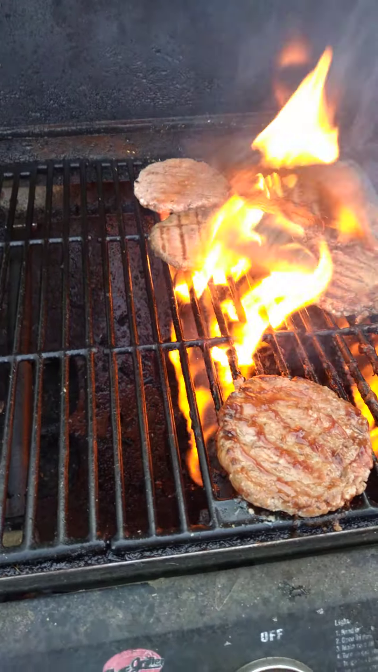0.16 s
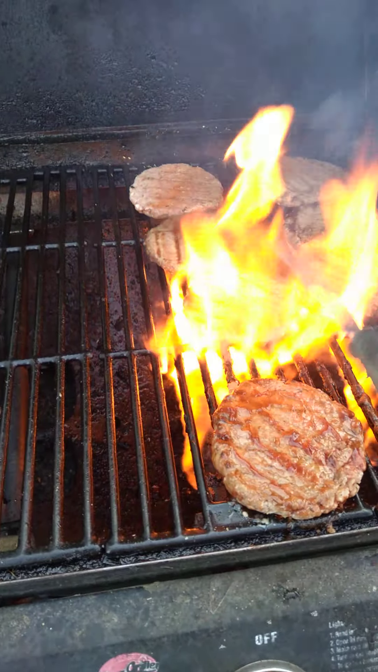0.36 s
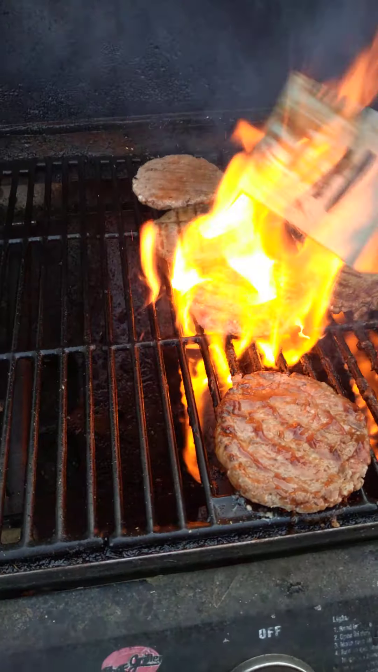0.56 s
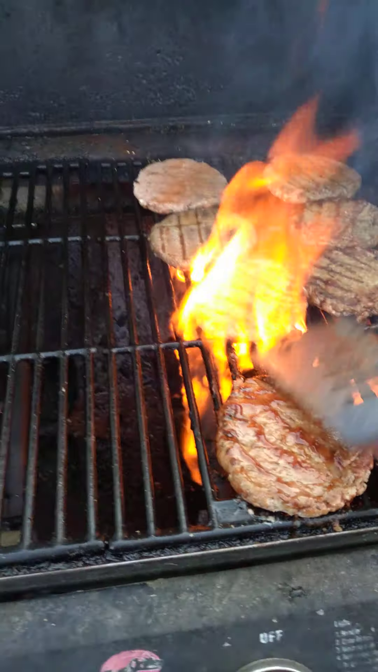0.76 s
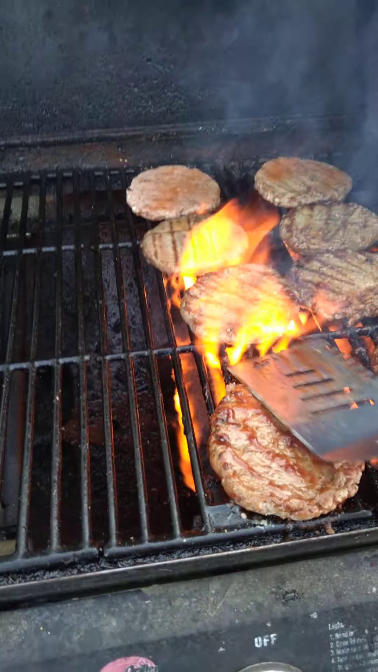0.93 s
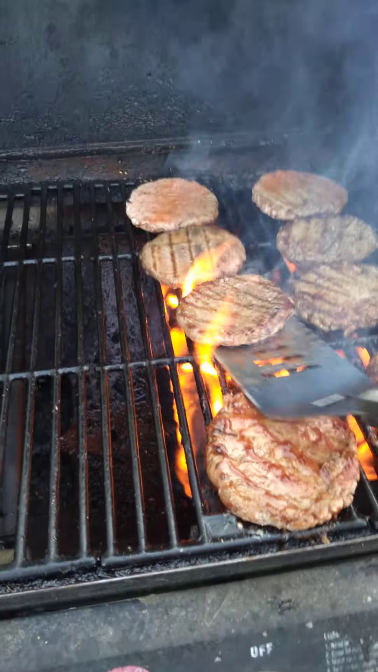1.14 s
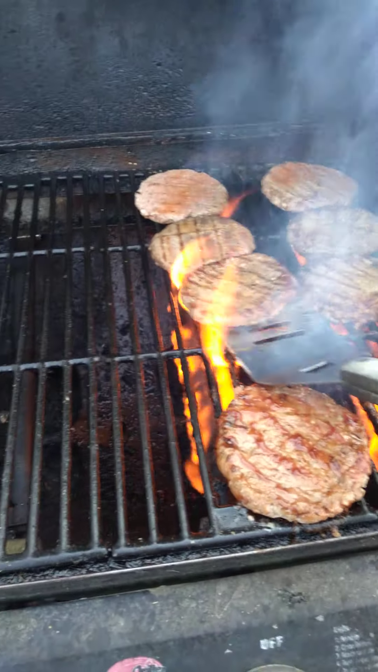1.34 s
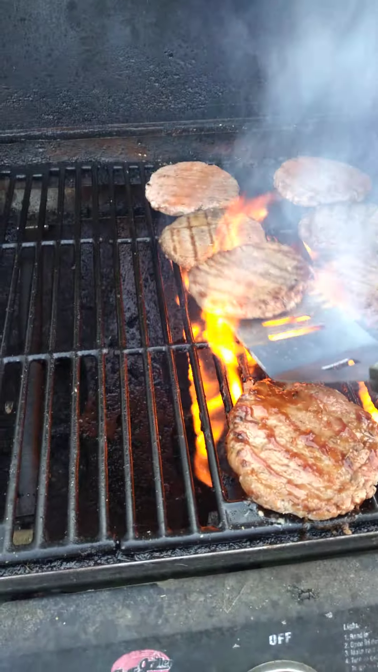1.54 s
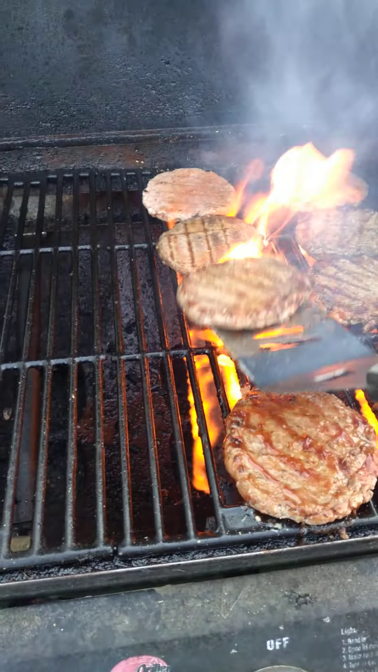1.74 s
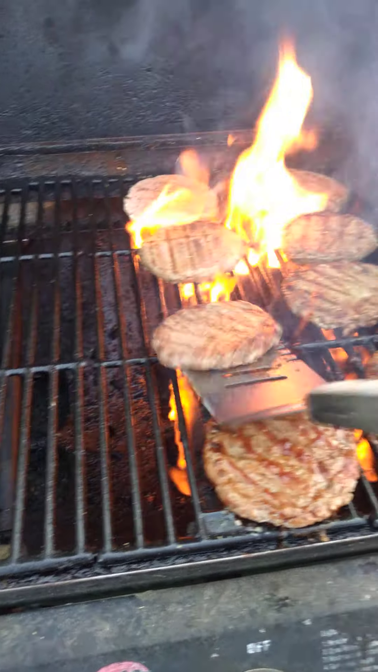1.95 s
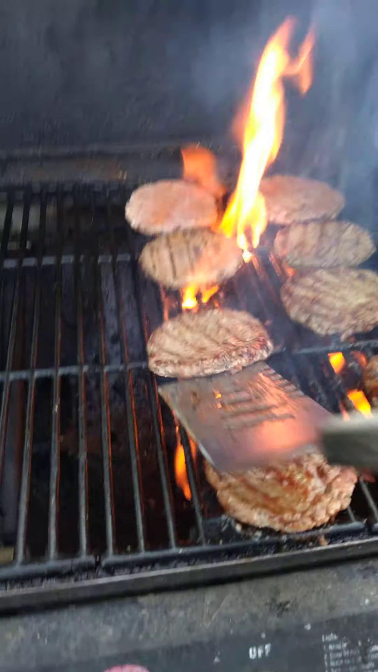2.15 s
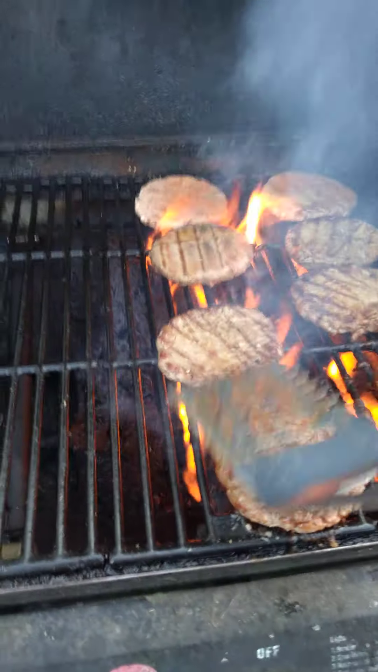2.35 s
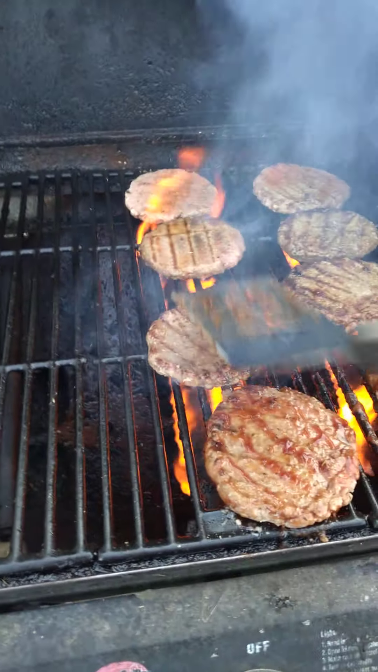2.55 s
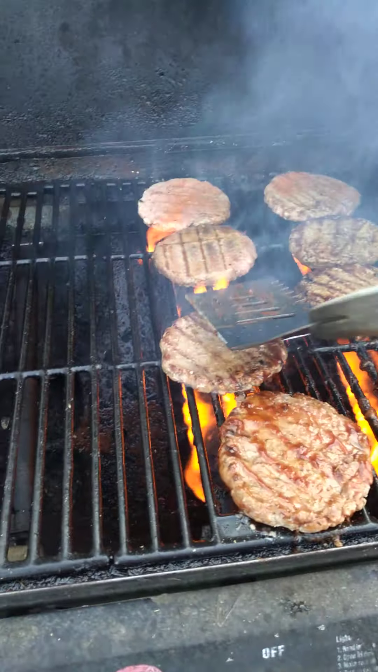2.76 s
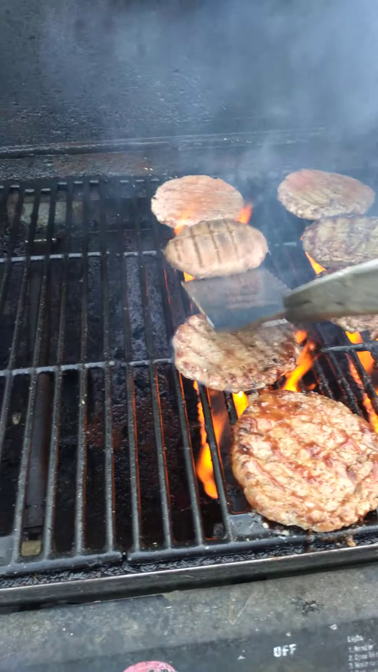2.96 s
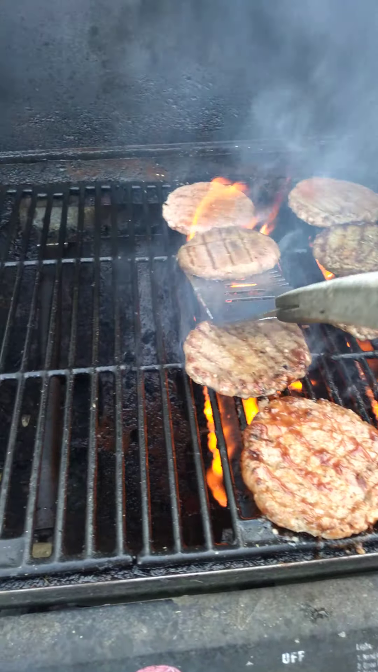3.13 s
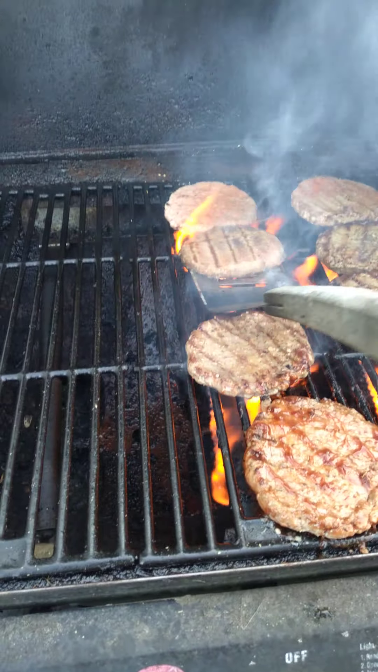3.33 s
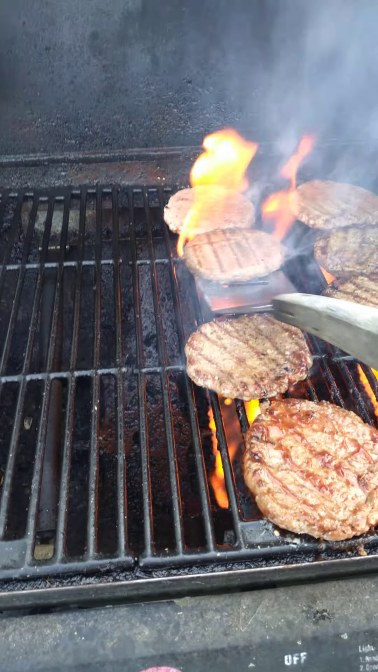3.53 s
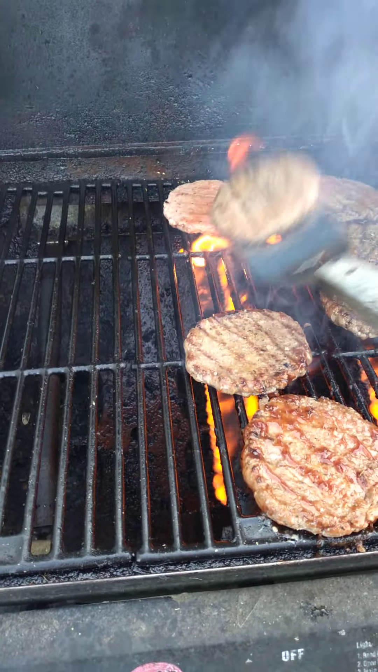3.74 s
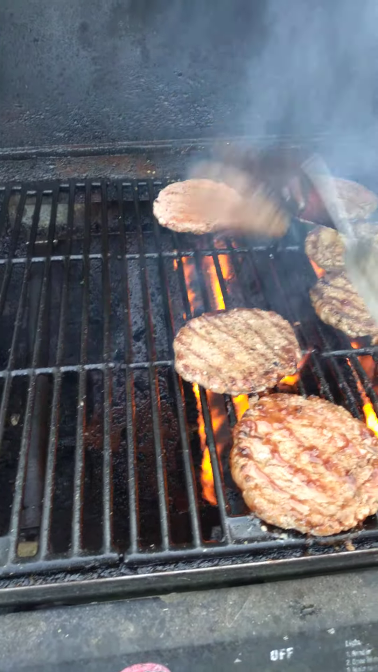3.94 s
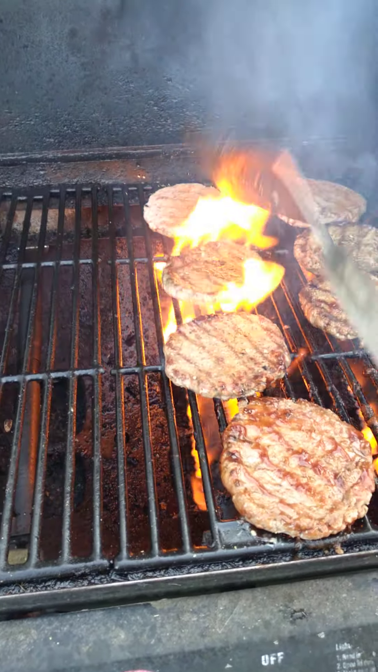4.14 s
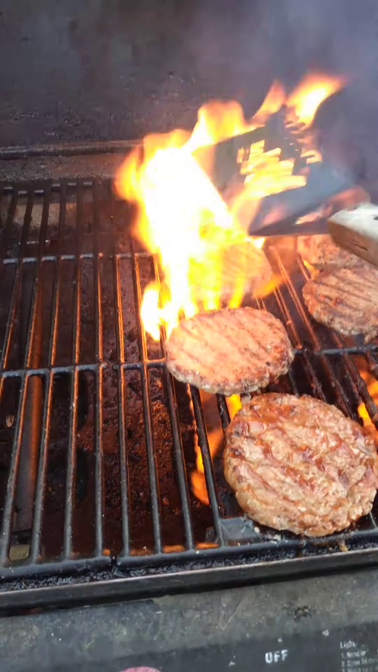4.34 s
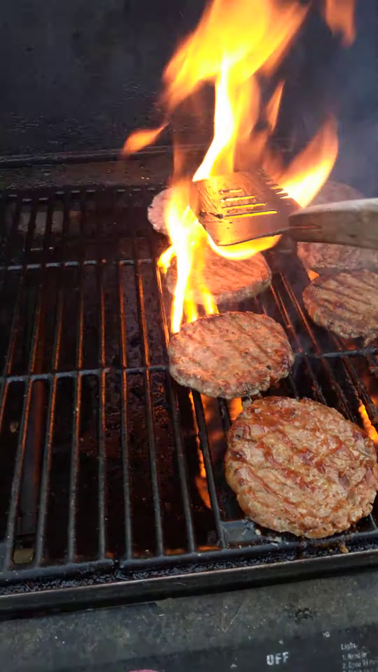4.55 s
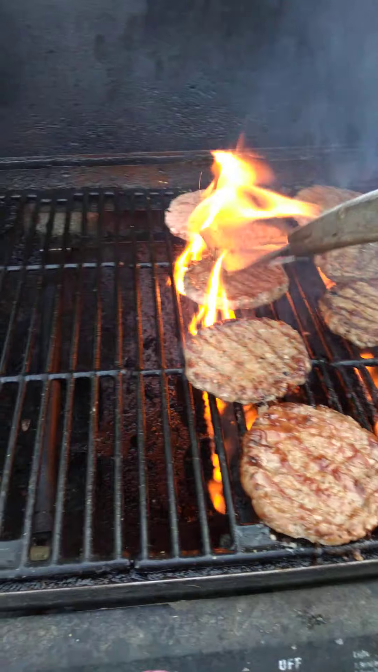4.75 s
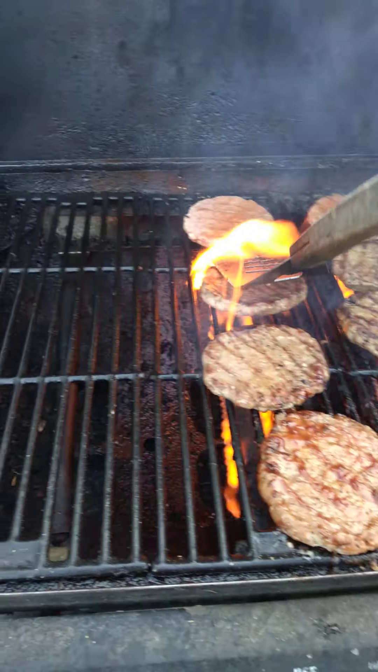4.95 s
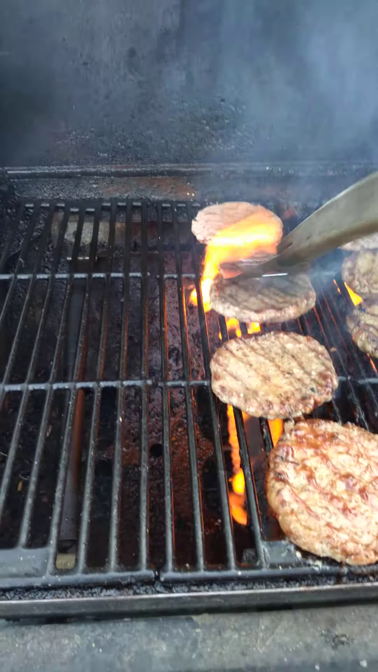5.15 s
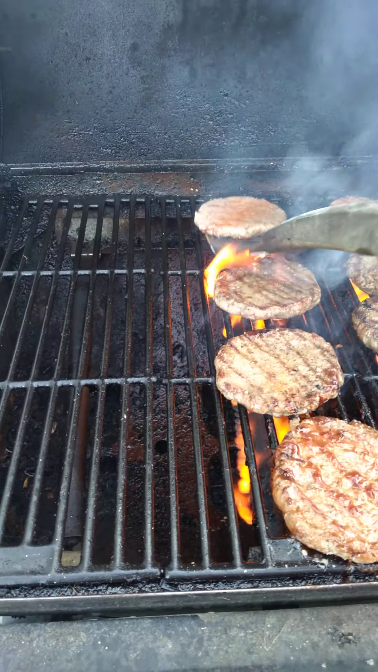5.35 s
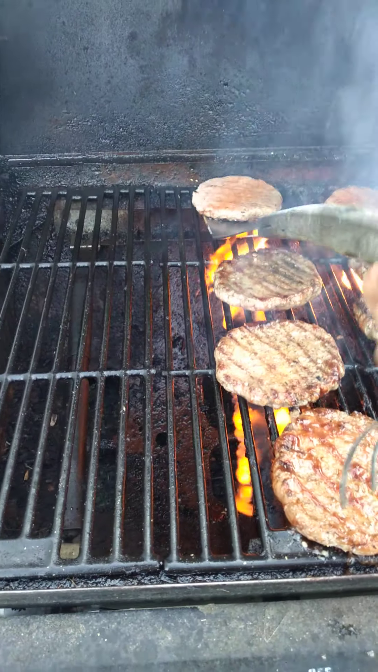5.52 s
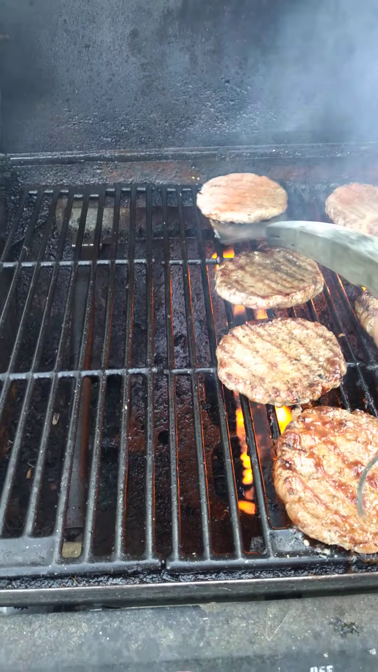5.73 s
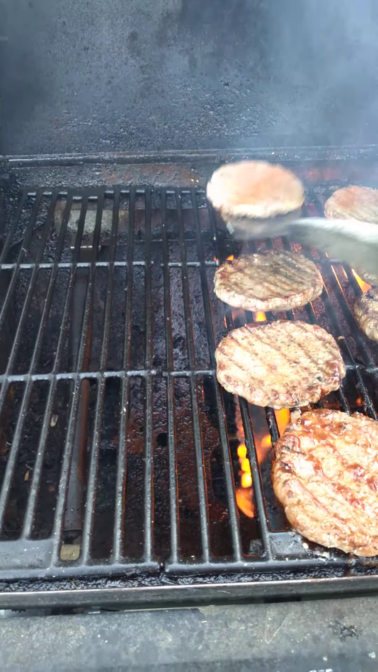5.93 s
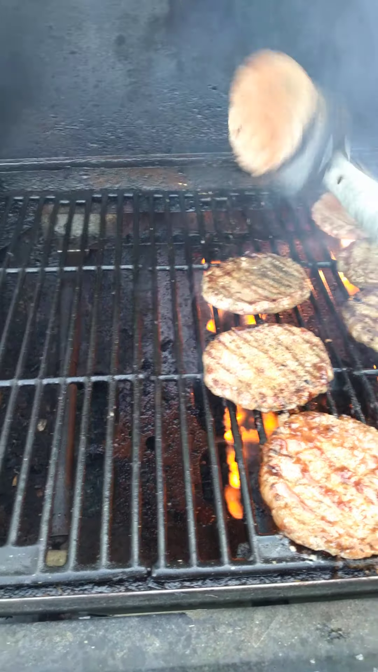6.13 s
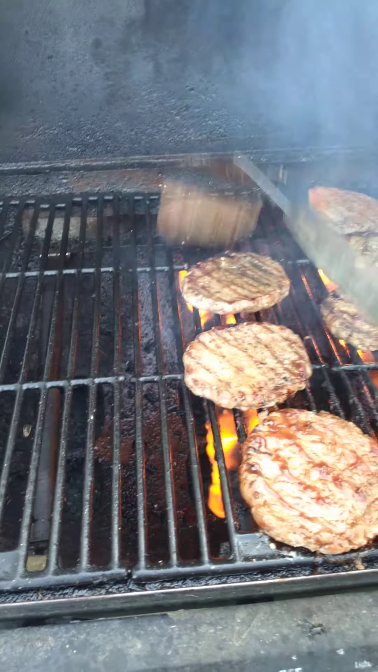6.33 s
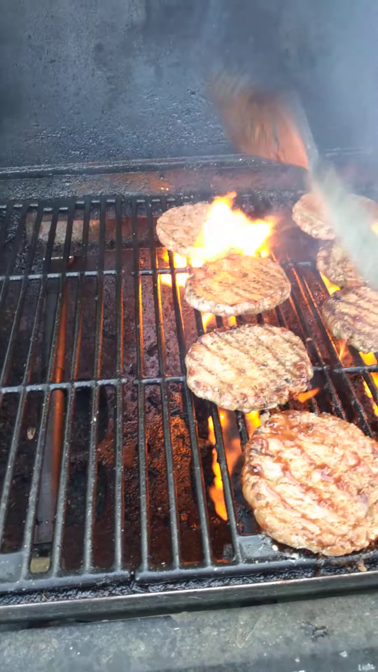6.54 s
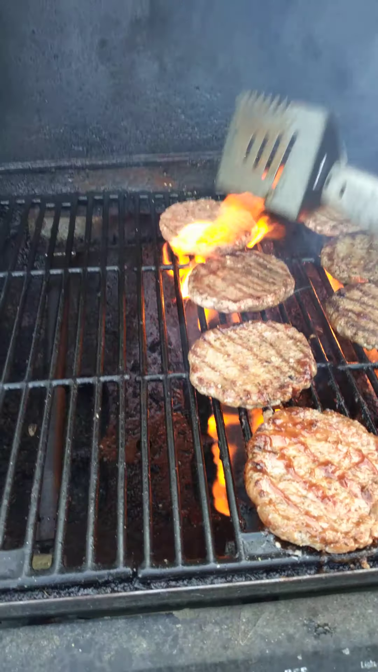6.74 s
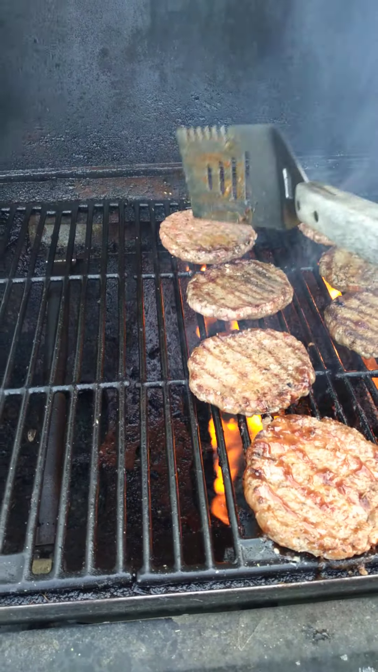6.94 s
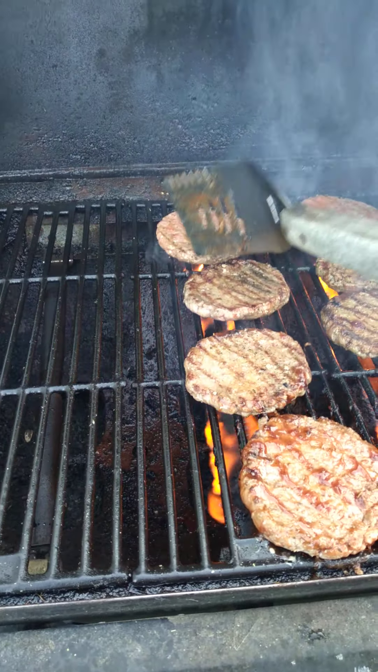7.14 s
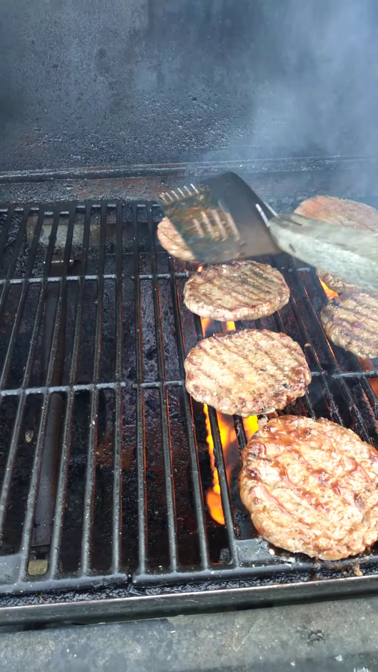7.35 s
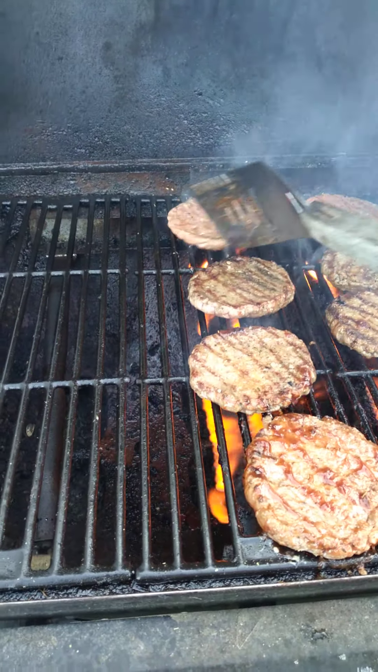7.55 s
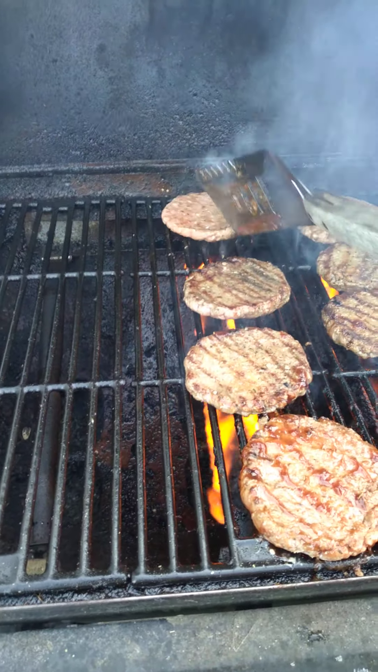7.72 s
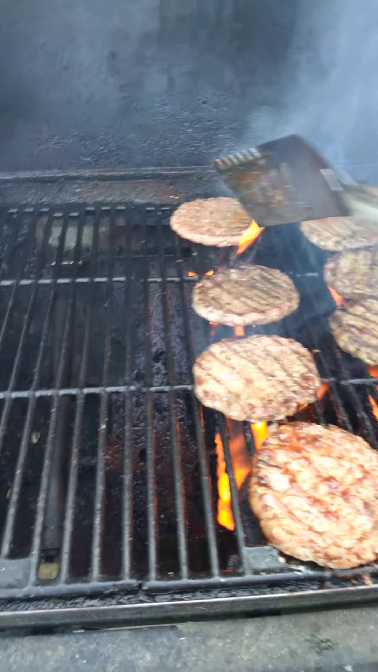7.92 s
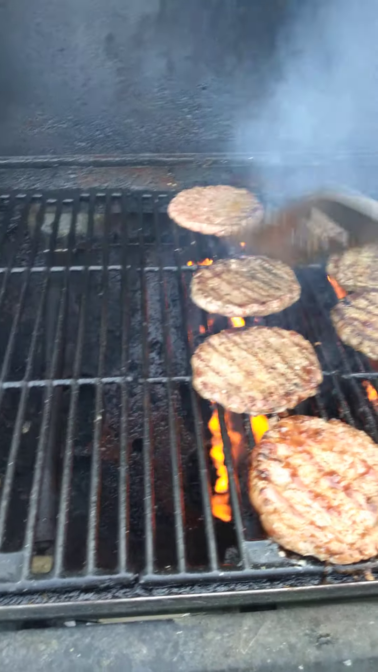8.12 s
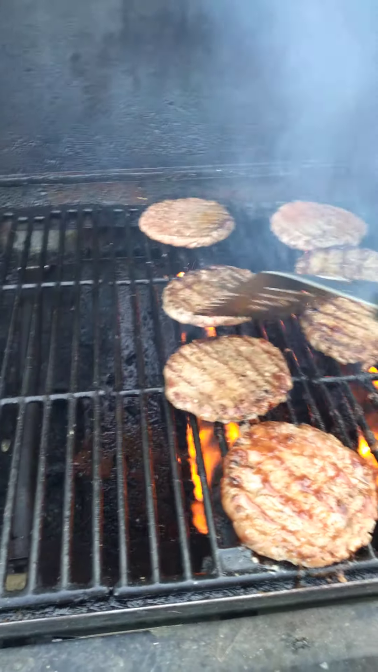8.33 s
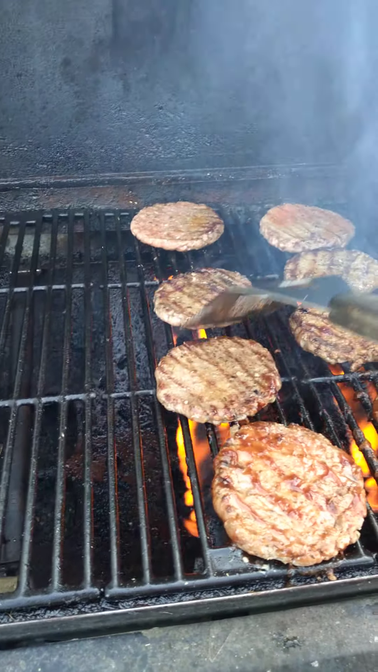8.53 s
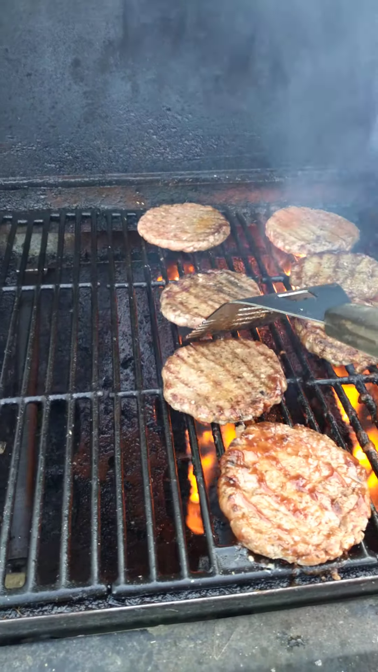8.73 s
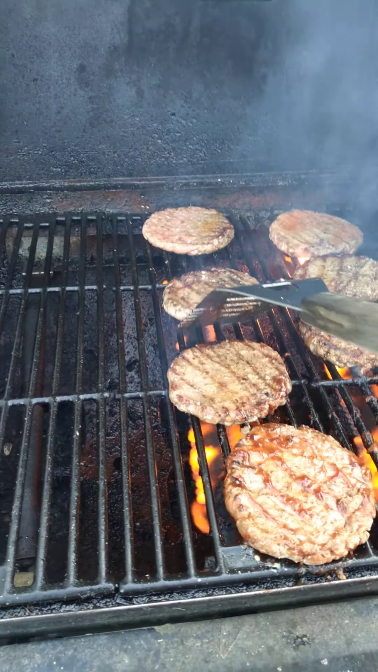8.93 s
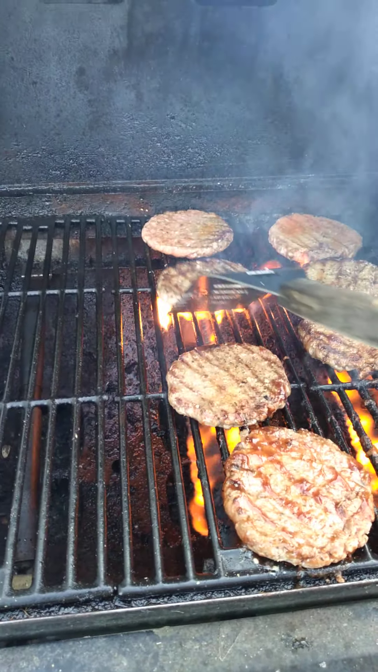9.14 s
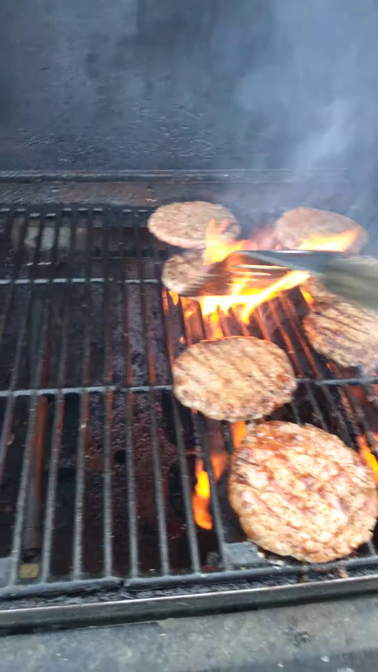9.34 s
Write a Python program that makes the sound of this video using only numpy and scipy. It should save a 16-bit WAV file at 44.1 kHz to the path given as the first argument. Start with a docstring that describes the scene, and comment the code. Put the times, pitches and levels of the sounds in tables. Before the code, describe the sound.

Burger patties sizzle close by on an outdoor gas grill, a steady, high hiss over a low burner rumble and a small engine idling far off. In the first half second the searing surges, with crackling fat and a spit of steam. A steel spatula strikes the grate sharply at 1 second, then scrapes as fat flares again near 1.8 seconds. Several briefly ringing clinks follow between 2.3 and 3.8 seconds. The biggest rush of searing and crackling comes from 4 to 4.7 seconds, followed by short scrapes and taps, with a sharp one at 5.1. At about 6.3 seconds a patty lands with a dull, hollow thud, then hisses, steams and crackles. The spatula taps lightly around 7.3 and 8.8 seconds. Just after 9 seconds come a ringing scrape, a smaller flare and a soft, low flutter of flame.

```python
"""Outdoors at a gas grill, burger patties fry while a steel spatula slides under them and flips them.
Bursting bubbles make a steady hiss. A turned patty lands with a thud, sears and spits steam,
and its fat crackles in the firebox as it flares. The blade taps the grate; short scrapes and sputters
come and go. Behind it all the burner rumbles and a small engine idles some way off."""
import sys
import numpy as np
from scipy import signal
from scipy.fft import rfft, irfft
from scipy.io import wavfile

SR = 44100
rng = np.random.default_rng(int(sys.argv[2]) if len(sys.argv) > 2 else 0)


def pcm_store(signal):
    """Save signal as 16-bit PCM."""
    levels = np.round(np.clip(np.atleast_2d(signal), -1, 1) * 32767)
    wavfile.write(sys.argv[1], SR, levels.astype(np.int16).T)


N = 418068
TIME = np.arange(N) / SR
HZ = np.fft.rfftfreq(N, 1 / SR)


# the tone of the bubbling: (frequency [Hz], level [dB])
BUBBLING_TONE = [(200, -21.5), (500, -17.5), (1000, -28), (1450, -23), (2400, -23), (4700, -17.5),
                 (6800, -11), (8000, -5), (8900, 0), (9700, -3), (11000, -7.5), (13000, -11.5),
                 (15800, -11.5)]
# bubbling sinks as the patties dry and revives when one is pressed: (time [s], relative level [dB])
BUBBLING_LEVEL = [(0, -39.5), (0.8, -40.5), (1.35, -41.5), (2.3, -41.5), (3.35, -42), (3.85, -44.5),
                  (5.1, -43), (5.9, -46.5), (7.7, -44.5), (8.45, -47), (9.3, -42.5)]

def bubbling():
    """Tiny bursting bubbles hiss steadily, and each sear stirs them up for a while."""
    bursts = pops(per_s=17000, spread_db=3.5, clump_db=0.67, echo_s=0.11, direct_db=-2, spots=8)
    stirred = [db + surge(s, rise, hold, fall_db_per_s=27) for s, rise, hold, _, db in SEARING_MOMENTS]
    level = together([curve(BUBBLING_LEVEL)] + stirred)
    return placed(coloured(bursts, BUBBLING_TONE), left_db=-1.5) * level * gain_of(-0.97)


# a bright rush, cut off sharply above about 9500 Hz: (frequency [Hz], level [dB])
RUSH_TONE = [(400, -59), (1500, -52), (2400, -20), (4800, -13.5), (5150, -6.5), (6000, -8.5), (7200, -5),
             (8000, -3.5), (8800, -0.5), (9350, -0.5), (9650, -15), (11000, -39), (15800, -50)]
# meat touches iron: (time of full contact [s], rise [s], hold [s],
# relative level of the rush [dB], relative level of the extra bubbling [dB])
SEARING_MOMENTS = [(0.043, 0.05, 0.06, -47.5, -56), (0.364, 0.13, 0.022, -34, -37.5),
                   (1.61, 0.056, 0.067, -51, -44.5), (1.825, 0.047, 0.022, -41.5, -42.5),
                   (4.07, 0.08, 0.26, -36, -39), (4.335, 0.26, 0.046, -31.5, -54),
                   (6.355, 0.06, 0.051, -47, -42.5), (6.508, 0.037, 0.025, -42, -44.5),
                   (9.17, 0.23, 0.014, -46.5, -53), (9.39, 0.051, 0.023, -49, -62)]

def searing():
    """Wet meat on hot iron gives a bright rush that soon drops back to a faint hiss."""
    bursts = pops(per_s=12000, spread_db=2.5, clump_db=0.8, echo_s=0.04, direct_db=-3.5)
    rushes = [db + surge(s, rise, hold, fall_db_per_s=119) for s, rise, hold, db, _ in SEARING_MOMENTS]
    level = together([-65.5] + rushes)  # the faint hiss never stops
    return placed(coloured(bursts, RUSH_TONE), left_db=1.0) * level * gain_of(2.5)


# the overall tone of the firebox, the space under the grate: (frequency [Hz], level [dB])
FIREBOX_TONE = [(30, -38), (150, -24), (330, -12.5), (520, -30), (650, -11), (1050, -16.5), (1250, -8.5),
                (2900, -4.5), (4100, -5.5), (4750, -17.5), (5200, -13), (7000, -5), (12000, -20)]
# pitches that this hollow space brings out: (frequency [Hz], width [Hz], boost [dB])
FIREBOX_PITCHES = [(740, 185, 8.5), (880, 22, 12.5), (1260, 226, 7), (1400, 143, 4), (1716, 32, 9),
                   (1935, 48, 6), (2270, 135, 8.5), (2472, 154, 8), (3360, 69, 4), (5140, 310, 10.5)]
# fat flares up: (time of full blaze [s], rise [s], hold [s], relative level [dB], ember fade [dB/s])
FAT_FLARES = [(0.066, 0.13, 0.095, -46, 16), (0.249, 0.054, 0.13, -40, 12), (1.63, 0.23, 0.18, -51, 34),
              (1.877, 0.26, 0.042, -40.5, 10.5), (3.29, 0.076, 0.34, -54.5, 55),
              (4.1, 0.069, 0.29, -36.5, 17.5), (4.31, 0.28, 0.034, -33.5, 20.5),
              (6.328, 0.08, 0.091, -47, 40), (6.528, 0.15, 0.023, -40.5, 30),
              (7.81, 0.044, 0.063, -55.5, 10), (8.6, 0.1, 0.23, -54.5, 20), (9.092, 0.14, 0.39, -46.5, 20)]

def burning_fat():
    """Dripping fat crackles in the firebox: each blaze collapses to embers, which fade more slowly."""
    crackle = pops(per_s=3500, spread_db=3.5, clump_db=1.1, echo_s=0.096, direct_db=-6.5)
    boost_db = sum(db / (1 + (2 * (HZ - hz) / width) ** 2) for hz, width, db in FIREBOX_PITCHES)
    hollow = coloured(irfft(rfft(crackle) * gain_of(boost_db), N), FIREBOX_TONE)
    levels_db = [-67]  # a quiet crackle goes on between flares
    for s, rise, hold, db, ember_fade in FAT_FLARES:
        blaze_db = surge(s, rise, hold, fall_db_per_s=81)
        embers_db = surge(s, rise, hold, ember_fade) - 5.5
        levels_db.append(db + np.maximum(blaze_db, embers_db))
    return placed(hollow, left_db=-1.5) * together(levels_db) * gain_of(-1.5)


# juice turns to steam under a patty: (start [s], length [s], level [dB])
STEAM_JETS = [(0.296, 0.47, -47.5), (4.38, 0.4, -43.5), (6.33, 0.316, -43)]
# the thin tone of its hiss: (frequency [Hz], level [dB])
STEAM_TONE = [(1000, -51), (4800, -11), (5150, 0.5), (5850, -4.5), (6400, -9), (8000, -13), (16000, -51)]

def steam():
    """Short jets of steam sputter out from under wet meat."""
    sputter = pops(per_s=8000, spread_db=1.5, clump_db=3.0, echo_s=0.36, direct_db=-24, spots=4)
    hiss = coloured(sputter, STEAM_TONE)
    out = np.zeros((2, N))
    for s, length, db in STEAM_JETS:
        swell(out, s, length, db, np.roll(hiss, -round(s * SR), 1), fade_in_s=0.067)
    return out


# the tone that all the rasps share: (frequency [Hz], level [dB])
RASP_TONE = [(30, -36), (100, 6), (220, 11.5), (480, 5), (750, 1.5), (1050, -34), (1400, -22), (1800, 11),
             (2400, -19), (3200, 8.5), (6000, -29), (14000, -30)]
# short rasps: (start [s], length [s], level [dB], ringing pitch [Hz], ring level over the rasp [dB])
# the two near 1 s make a brief ringing haze, near 700 and 2400 Hz, around the sharp tap
RASPS = [(0.093, 0.4, -56.5, 715, 2), (0.996, 0.09, -52, 718, 15), (0.983, 0.096, -50, 2400, 12),
         (1.598, 0.059, -48.5, 1750, 7), (1.698, 0.27, -47, 1800, 2), (1.887, 0.076, -48.5, 690, 4),
         (2.323, 0.065, -49.5, 2200, 2.5), (3.347, 0.11, -54, 2600, 3), (3.6, 0.02, -53, 790, -5),
         (4.523, 0.2, -50, 1370, 1), (4.768, 0.073, -52.5, 925, 10), (4.945, 0.096, -54, 1470, -3),
         (6.475, 0.13, -44.5, 2050, -2.5), (6.62, 0.09, -52, 2640, 9), (6.743, 0.14, -63, 2800, 6.5),
         (7.587, 0.08, -61.5, 1570, -2), (8.6, 0.12, -58.5, 685, -11), (8.819, 0.038, -49.5, 2350, 6),
         (8.823, 0.081, -61.5, 490, 13), (9.032, 0.3, -52, 1470, 3), (9.266, 0.27, -56, 2320, 20)]

def scrapes_and_sputters(sharpness):
    """Short rasps, each with one ringing pitch; the scrapes are the blade sticking and slipping."""
    grit = pops(per_s=1800, spread_db=3.5, clump_db=3.0, echo_s=0.24, direct_db=0.5, spots=3)
    rasp = coloured(grit, RASP_TONE)
    out = np.zeros((2, N))
    for s, length, db, hz, ring_db in RASPS:
        span = slice(round(s * SR), round((s + length) * SR))
        # a higher ring spreads over a wider band of frequencies
        half_width_hz = np.sqrt(hz) * 16 / sharpness
        ring = filtered(grit[:, span], 2, [hz - half_width_hz, hz + half_width_hz], "band")
        ringing_rasp = evened(rasp[:, span]) + gain_of(ring_db) * evened(ring)
        swell(out, s, length, db, ringing_rasp, fade_in_s=0.011)
    return out


# the blade hits the grate:
# (time [s], relative level [dB], brightness [dB/octave], time for the rattle to fade 30 dB [s])
BLADE_HITS = [(1.027, -31.5, 4, 0.001), (1.713, -51, -9, 0.017), (1.909, -39.5, -11, 0.037),
              (2.352, -41, 0.5, 0.027), (2.538, -43, 2.5, 0.028), (2.8, -35.5, 3.5, 0.008),
              (3.289, -36.5, 5.5, 0.052), (3.399, -44.5, -1, 0.024), (3.768, -49, 3.5, .02),
              (4.779, -39.5, 0, 0.017), (4.822, -40, 2, 0.027), (5.099, -31.5, 4.5, 0.014),
              (7.256, -38.5, -0.5, 0.021), (7.361, -42.5, 5.5, 0.0029), (8.825, -39.5, 5.5, 0.01)]
# the notes of blade and grate: (pitch [Hz], relative level [dB], time to fade 60 dB [s])
STEEL_NOTES = [(750, 4.5, 0.17), (1446, 1, 0.2), (1700, 7, 0.066), (1906, 1, .08), (2477, 9.5, 0.074),
               (2550, -4.5, 0.11), (2940, 8, 0.046), (2950, -4, .06), (5740, -19, 0.076), (6600, -13, .04)]

def spatula_taps(ring_db, level_db, rattle_db, size=22050):
    """Steel meets iron: a tick and a short rattle set blade and grate ringing."""
    t = np.arange(size) / SR
    octaves = np.log2(np.clip(np.fft.rfftfreq(size, 1 / SR), 500, 9000) / 2000)
    out = np.zeros((2, N))
    for s, db, brightness, rattle_s in BLADE_HITS:
        rattle = rng.standard_normal(size) * gain_of(-30 * t / rattle_s)
        blow = signal.unit_impulse(size) + gain_of(rattle_db) * rattle / np.linalg.norm(rattle)
        echoes = lid_echoes(echo_s=0.23, direct_db=-3, size=size)
        ring = sum(gain_of(note_db - 60 * t / fade_s) * np.sin(2 * np.pi * (hz * t + rng.random((2, 1))))
                   for hz, note_db, fade_s in STEEL_NOTES)
        response = echoes + gain_of(ring_db) * evened(ring) / np.sqrt(size)
        hit = signal.fftconvolve(blow[None], response, axes=1)[:, :size]
        hit = filtered(hit, 1, [600, 4500], "band")
        # bare steel gives a bright blow, a greasy bar a dull one
        hit = irfft(rfft(hit) * gain_of(brightness * octaves), size)[:, :size // 2]
        add(out, s, gain_of(db + level_db) * hit / np.linalg.norm(hit))
    return out


# a patty is nudged or lands: (time [s], relative level [dB], top frequency [Hz], time to fade 60 dB [s])
PATTY_THUDS = [(0.01, -53, 242, 0.083), (0.326, -51.5, 480, 0.37), (1.161, -55.5, 280, 0.17),
               (1.891, -52, 300, 0.25), (4.101, -52, 423, 0.46), (5.331, -59, 450, 0.3),
               (5.996, -59, 300, 0.15), (6.322, -42, 560, 0.14), (6.336, -32.5, 670, 0.15),
               (6.366, -30.5, 310, 0.16), (6.401, -49.5, 955, 0.8), (6.435, -38, 217, 0.31),
               (8.826, -58, 600, 0.2)]
# the low notes of the grill's body: (pitch [Hz], relative level [dB], time to fade 60 dB [s])
BODY_NOTES = [(125, -13, 0.3), (164.3, 7, 0.56), (205, -3, .25), (249, -4, 0.27), (323, 0, 0.22),
              (415, -3, 0.16), (581, -16, 0.25)]

def patty_flops(boom_db, size=22050):
    """Soft meat lands edge first, then flat: dull pushes that make the grill's body boom."""
    t = np.arange(size) / SR
    boom = sum(gain_of(db - 60 * t / fade_s) * np.sin(2 * np.pi * hz * t)
               for hz, db, fade_s in BODY_NOTES)
    out = np.zeros((2, N))
    for s, db, top_hz, fade_s in PATTY_THUDS:
        push = filtered(rng.standard_normal(size), 4, [155, top_hz], "band")
        thud = evened(push) * gain_of(-60 * t / fade_s) + gain_of(boom_db) * boom
        add(out, s, gain_of(db) * thud[None])
    return filtered(out, 5, 135, "high")  # thin panels give off hardly any deep bass


# the tone of the burner and the open air: (frequency [Hz], level [dB])
RUMBLE_TONE = [(20, -36), (35, -47), (52, -1), (75, -21), (150, 1.5), (300, -7.5), (500, -19), (1000, -16),
               (3000, -96), (10000, -60)]
# the tone of a fluttering flame: (frequency [Hz], level [dB])
FLAME_TONE = [(30, -35), (80, -9), (105, 7), (145, 5), (200, -18), (600, -41), (3000, -80)]

def burner():
    """The burner rumbles steadily; near the end a flame catches and flutters."""
    rumble = gain_of(-67) * coloured(rng.standard_normal((2, N)), RUMBLE_TONE)
    flame = coloured(rng.standard_normal((2, N)), FLAME_TONE)
    return rumble + flame * gain_of(-60 + surge(s=9.28, rise=0.04, hold=0, fall_db_per_s=0))


# the engine's wandering speed: (time [s], firings [per s])
ENGINE_SPEED = [(0.0, 23.111), (0.6, 25.759), (1.8, 24.195), (2.8, 24.653), (5.2, 23.341), (6.2, 22.466),
                (7.4, 23.721), (8.0, 24.521), (9.48, 25.162)]
# the tone of one exhaust puff: (frequency [Hz], level [dB])
PUFF_TONE = [(20, -42), (50, -30), (75, -6.5), (100, -2.5), (125, 0.5), (165, -6.5), (200, 2.5),
             (260, -10.5), (330, -16), (450, -30), (900, -68), (3000, -62)]

def engine(level_db, uneven_db, echo_s, echo_db, size=4096):
    """An idling engine gives one soft puff each time it fires, and a wall echoes it."""
    fired_so_far = np.floor(np.cumsum(curve(ENGINE_SPEED)) / SR)
    firings = np.diff(fired_so_far, prepend=0) * gain_of(uneven_db * drift(rate_hz=7.1))
    puff = np.fft.fftshift(irfft(gain_of(value_at(PUFF_TONE, np.fft.rfftfreq(size, 1 / SR)))))
    direct = signal.oaconvolve(firings, puff, "same")
    echo = np.interp(TIME - echo_s, TIME, direct, left=0)
    return gain_of(level_db) * evened(direct + gain_of(echo_db) * echo)


def pops(per_s, spread_db, clump_db, echo_s, direct_db, spots=6):
    """Random pops from several spots on the grill: many small, a few large, coming in clumps."""
    out = np.zeros((2, N))
    for _ in range(spots):
        sizes = gain_of(spread_db * np.minimum(rng.exponential(1, N), 6.5))
        clicks = sizes * rng.choice([-1, 1], N) * (rng.random(N) < per_s / spots / SR)
        out += signal.oaconvolve(clicks[None], lid_echoes(echo_s, direct_db), axes=1)[:, :N]
    return out * gain_of(clump_db * drift(rate_hz=18))


def lid_echoes(echo_s, direct_db, size=4096):
    """A click arrives directly, then as echoes off the steel lid that fade 60 dB in echo_s."""
    path = rng.standard_normal((2, size)) * gain_of(-60 * np.arange(size) / SR / echo_s)
    path /= np.linalg.norm(path, axis=1, keepdims=True)
    path[[0, 1], rng.integers(0, 12, 2)] += gain_of(direct_db)
    return path / np.linalg.norm(path, axis=1, keepdims=True)


def surge(s, rise, hold, fall_db_per_s):
    """A level in dB that climbs its last 20 dB in the rise time, is full at s, holds, then falls."""
    climb_db = -20 * (np.maximum(s - TIME, 0) / rise) ** 2
    return climb_db - fall_db_per_s * np.maximum(TIME - s - hold, 0)


def swell(mix, s, length, db, sound, fade_in_s, fade_out_share=0.32):
    """Mixes in a stretch of sound at time s, fading it in and out."""
    part = sound[:, :round(length * SR)]
    t = np.arange(part.shape[1]) / SR
    shape = np.clip(t / fade_in_s, 0, 1) * np.clip((length - t) / (fade_out_share * length), 0, 1)
    add(mix, s, gain_of(db) * evened(part) * shape)


def add(mix, s, sound):
    """Mixes a sound in at time s."""
    part = mix[:, round(s * SR):][:, :sound.shape[1]]
    part += sound[:, :part.shape[1]]


def together(levels_db):
    """The combined strength of unrelated sounds: their powers add."""
    return np.sqrt(sum(10 ** (np.maximum(db, -200) / 10) for db in levels_db))


def coloured(x, tone):
    """Shapes x with a tone table, at an average strength of one."""
    size = x.shape[-1]
    return evened(irfft(rfft(x) * gain_of(value_at(tone, np.fft.rfftfreq(size, 1 / SR))), size))


def filtered(x, order, hz, kind):
    """Keeps a band of frequencies, or the high ones; a higher order cuts more sharply."""
    return signal.sosfilt(signal.butter(order, hz, kind, fs=SR, output="sos"), x)


def placed(x, left_db):
    """Leans a sound to the left, or to the right if left_db is negative."""
    return x * gain_of(left_db * np.array([[.5], [-.5]]))


def drift(rate_hz):
    """A slow random wobble with a typical size of one."""
    return evened(irfft(rfft(rng.standard_normal(N)) / (1 + (HZ / rate_hz) ** 2), N))


def curve(points):
    """Joins points in time with straight lines."""
    return np.interp(TIME, *np.transpose(points))


def value_at(points, hz):
    """Looks up a table by frequency, giving each octave about equal room."""
    table_hz, values = np.transpose(points)
    return np.interp(np.log(hz + 1), np.log(table_hz + 1), values)


def evened(x):
    """Scales x to an average strength (rms) of one."""
    return x / np.sqrt(np.mean(x ** 2) + 1e-20)


def gain_of(db):
    """Turns decibels into a multiplier."""
    return 10 ** (np.asarray(db) / 20)


# how alike left and right sound: (frequency [Hz], likeness [1 = the same, 0 or less = unrelated])
SIDES_ALIKE = [(100, 0.74), (350, 0.94), (650, 0.36), (1000, -1.1), (1400, 0.33), (2400, 0), (3200, 0.1),
               (6000, 0.07), (12000, -0.47)]
# how far the left side's wave runs ahead of the right's: (frequency [Hz], lead [radians])
LEFT_LEAD = [(100, 0), (750, 0), (1400, -1), (2500, -1.1), (3800, -3), (9000, -10)]

def scene():
    """Mixes all the sources; left and right share the low sounds but differ in the highs."""
    frying = bubbling() + searing() + burning_fat() + steam()
    rasps = scrapes_and_sputters(sharpness=4.1)
    taps = spatula_taps(ring_db=-10, level_db=26.3, rattle_db=2.5)
    left, other = frying + rasps + taps + burner()
    alike = np.clip(value_at(SIDES_ALIKE, HZ), 0, 1)
    blend = alike * rfft(left) + np.sqrt(1 - alike ** 2) * rfft(other)
    right = irfft(blend * np.exp(-1j * value_at(LEFT_LEAD, HZ)), N)
    grill = np.array([left, right]) + patty_flops(boom_db=-12.0)
    return grill + engine(level_db=-63.0, uneven_db=2.1, echo_s=0.00903, echo_db=-6)


# which side is louder: (frequency [Hz], left minus right [dB])
SIDE_BALANCE = [(100, 0), (550, 2), (870, 6), (1150, 3), (1900, 2), (2450, 5), (3300, 1), (5100, 1),
                (6400, 3), (7300, -1), (8600, 1.5), (9600, -3.5), (11000, -1.5), (15000, 1.5)]
TREBLE_LIMIT_HZ = 15850

def record(dry):
    """Gives each side its own tone, then cuts off the very highest sounds."""
    balanced = irfft(placed(rfft(dry), left_db=value_at(SIDE_BALANCE, HZ)), N)
    treble_cut = signal.firwin(1023, TREBLE_LIMIT_HZ, window=("kaiser", 9), fs=SR)
    return signal.oaconvolve(balanced, treble_cut[None], "same")


dry = scene()
out = record(dry)
pcm_store(out)
```